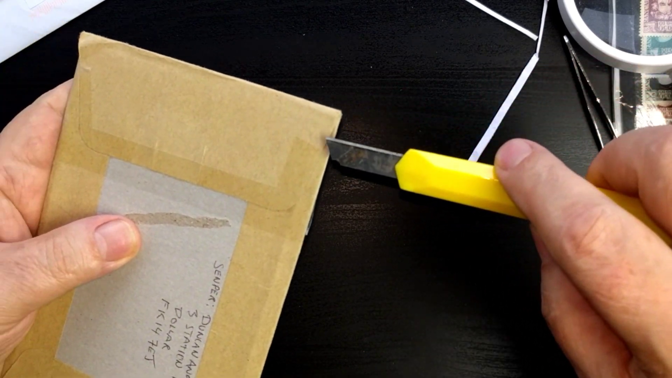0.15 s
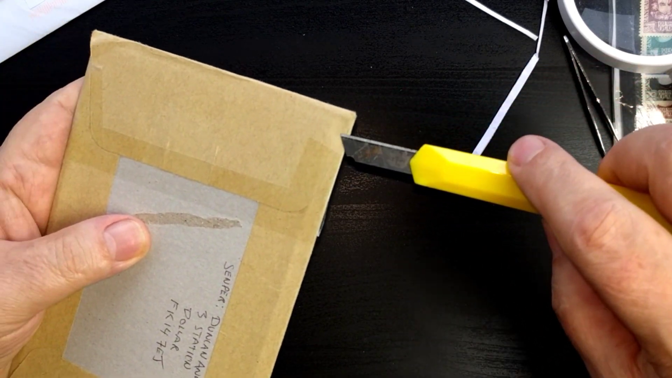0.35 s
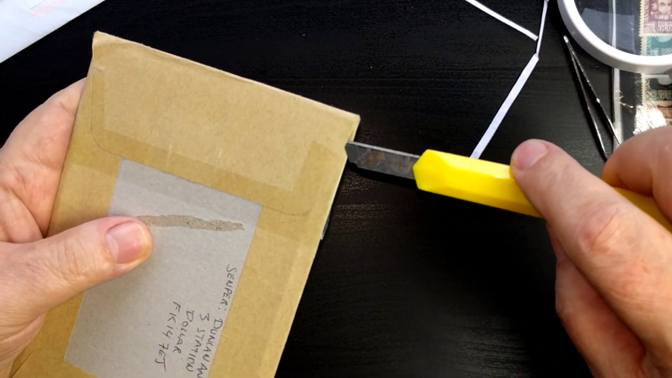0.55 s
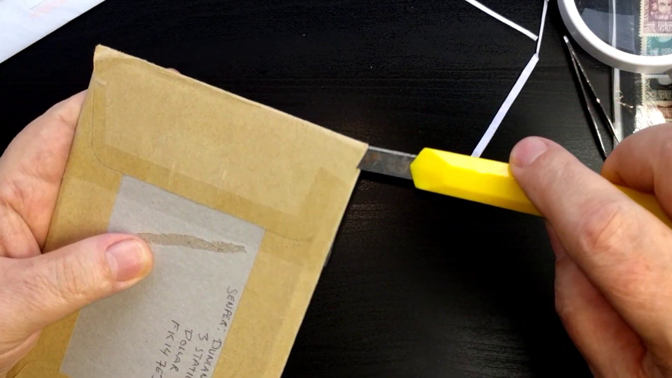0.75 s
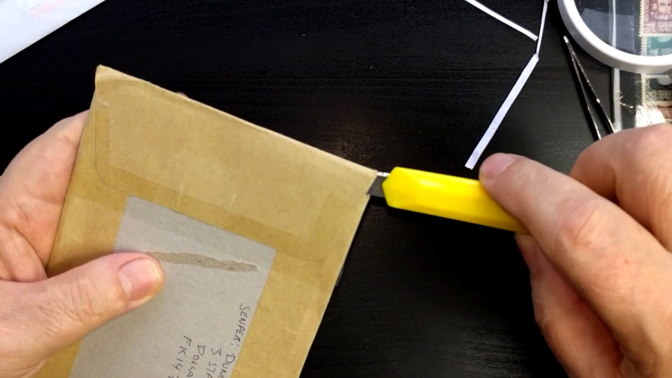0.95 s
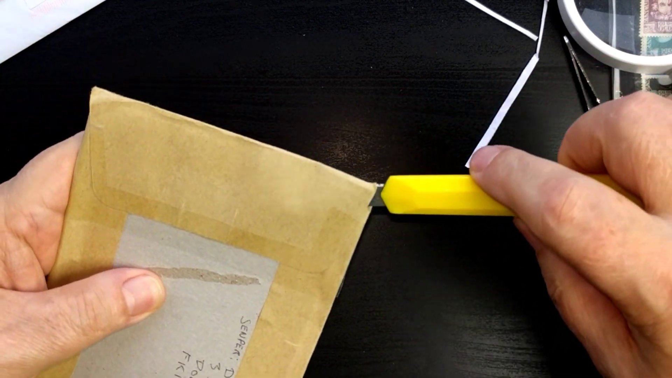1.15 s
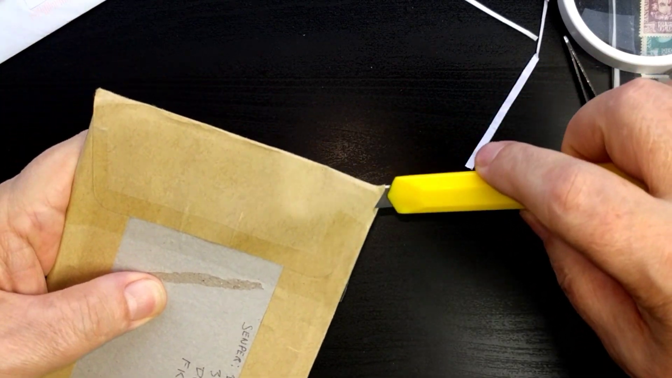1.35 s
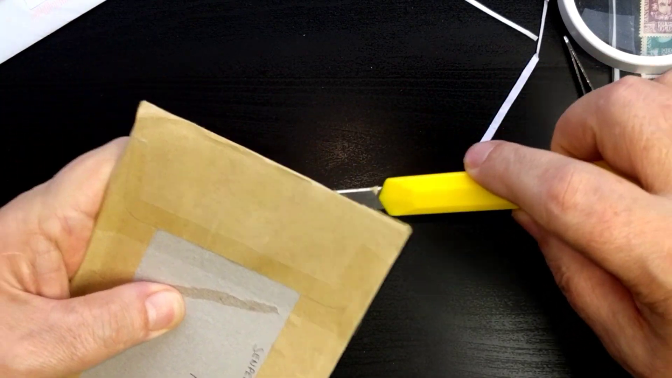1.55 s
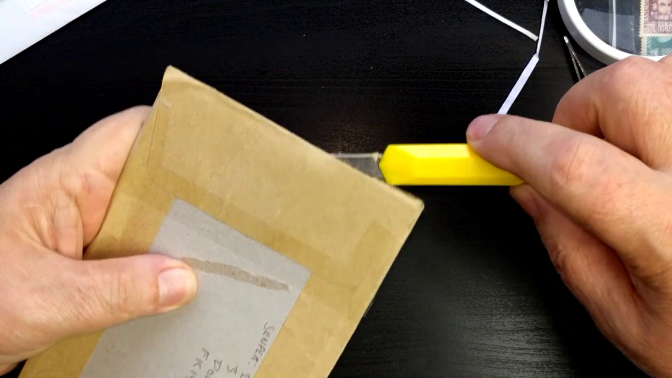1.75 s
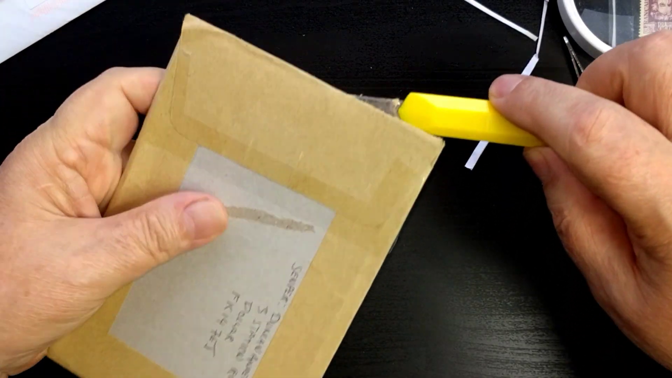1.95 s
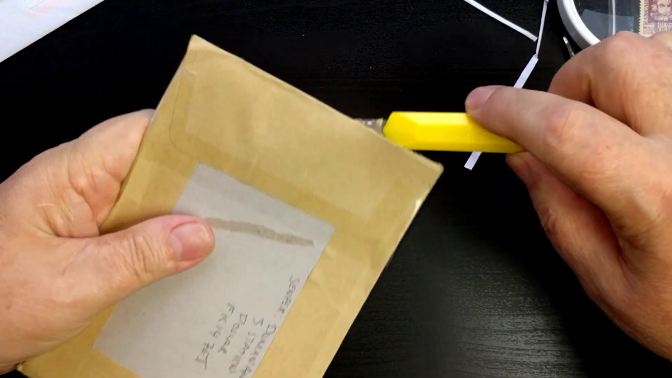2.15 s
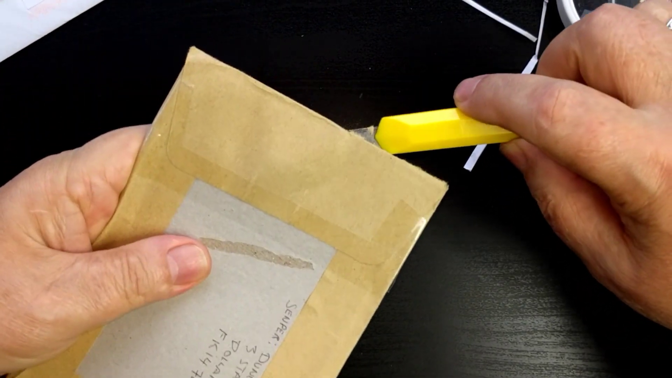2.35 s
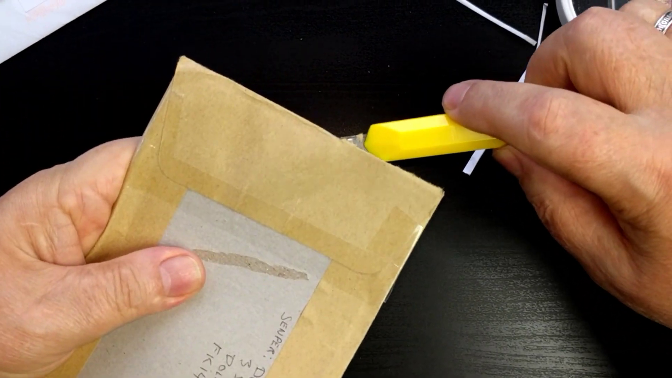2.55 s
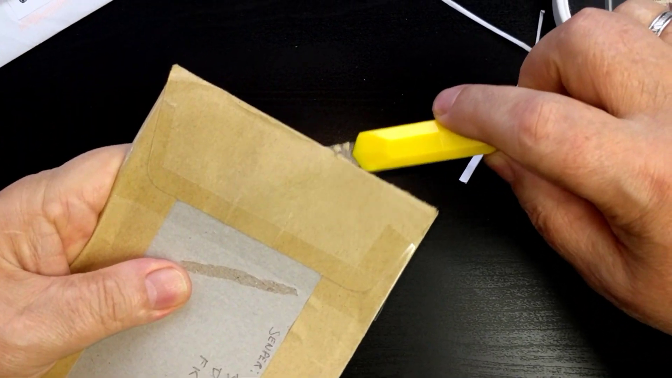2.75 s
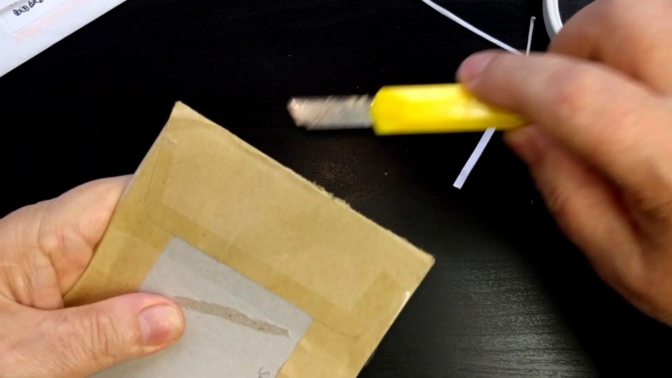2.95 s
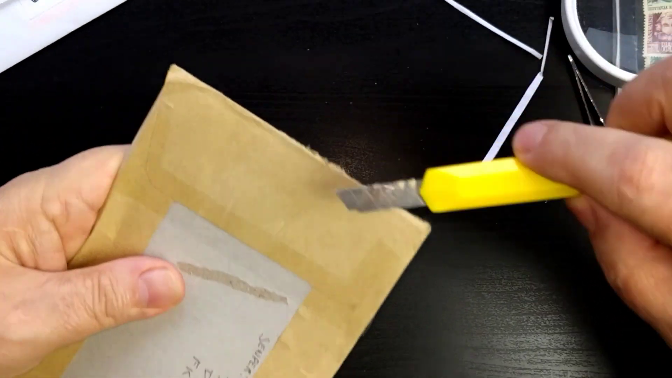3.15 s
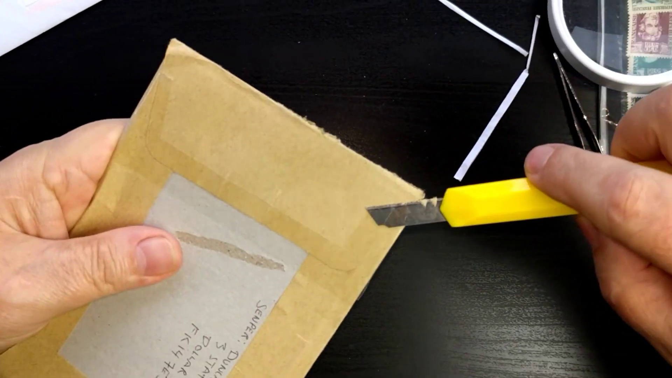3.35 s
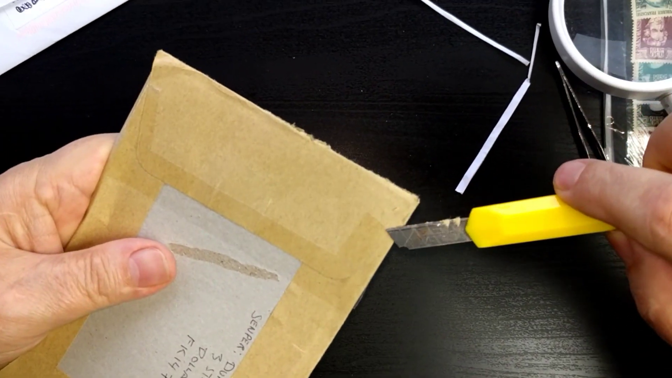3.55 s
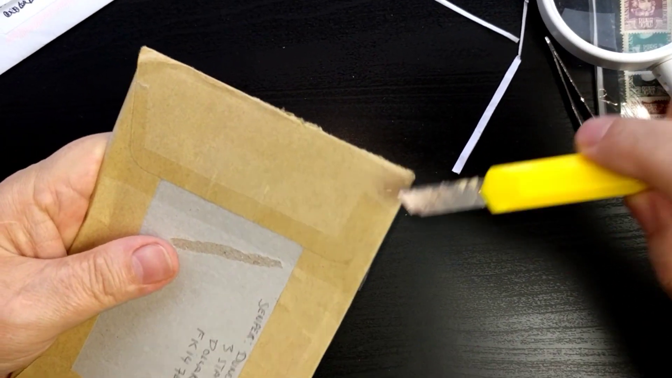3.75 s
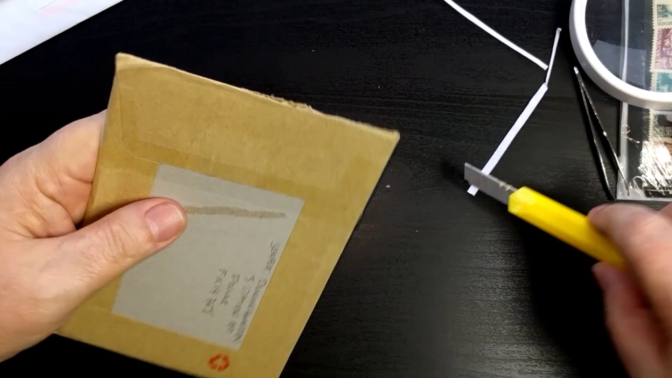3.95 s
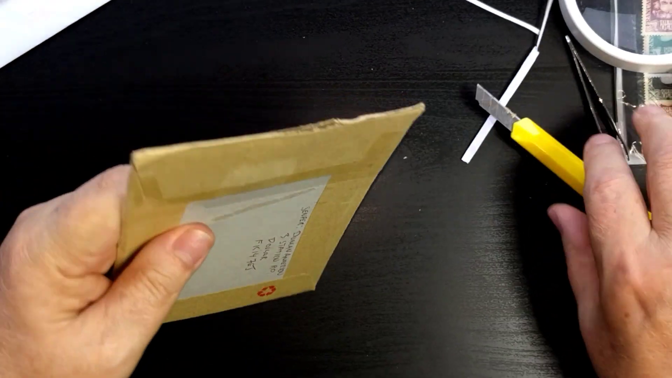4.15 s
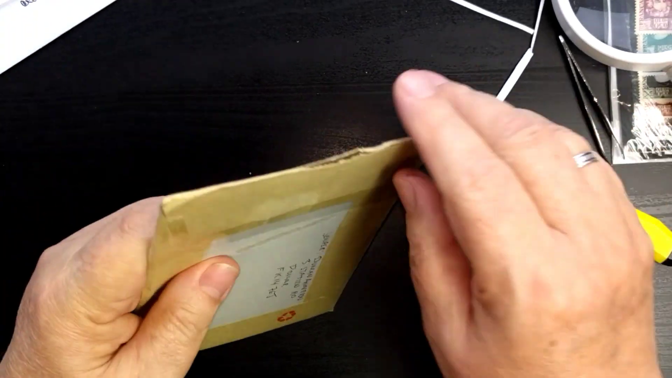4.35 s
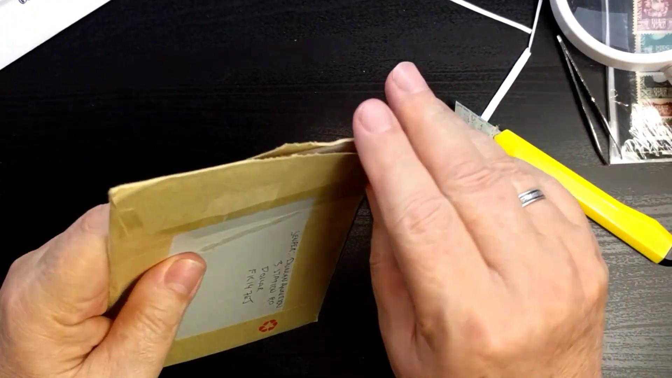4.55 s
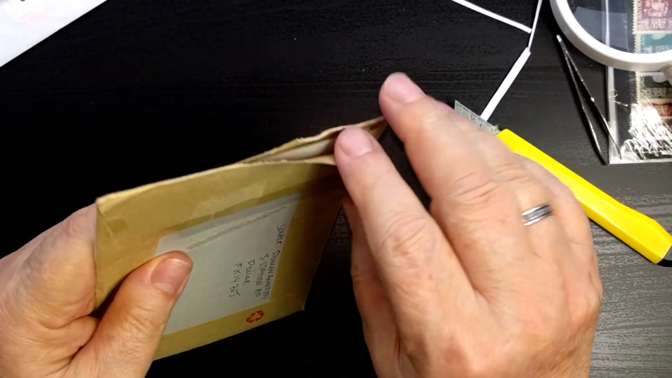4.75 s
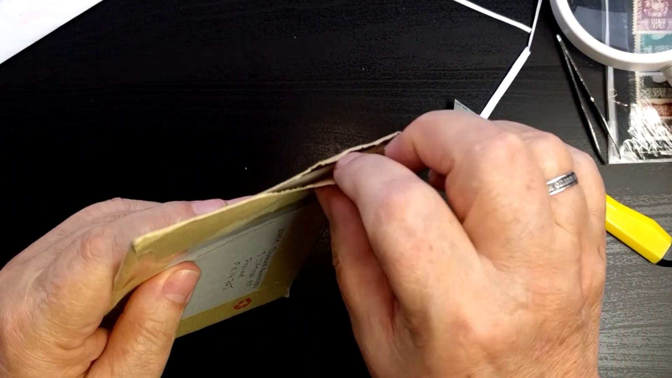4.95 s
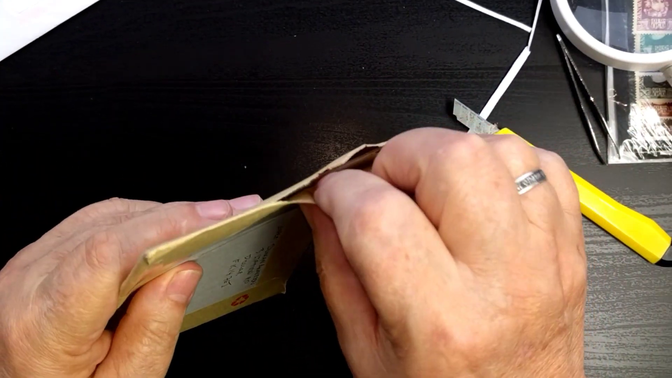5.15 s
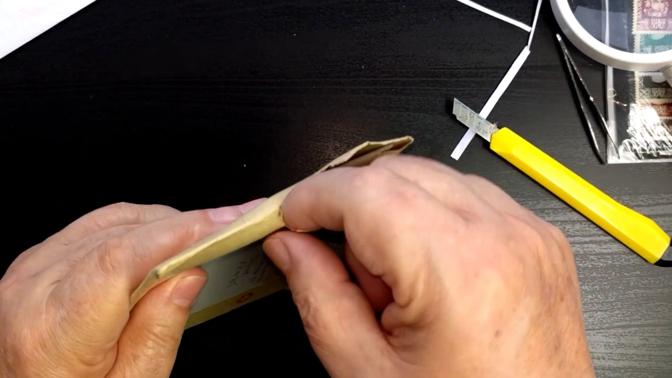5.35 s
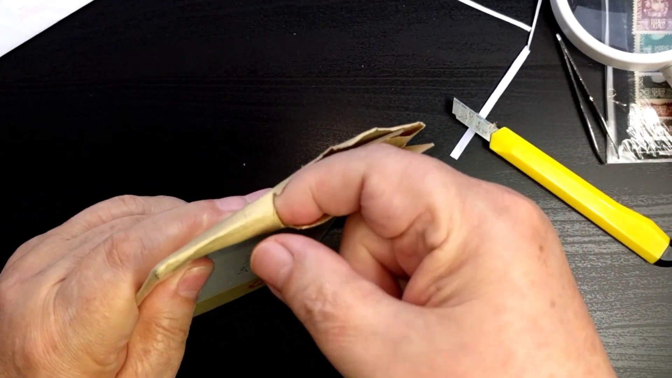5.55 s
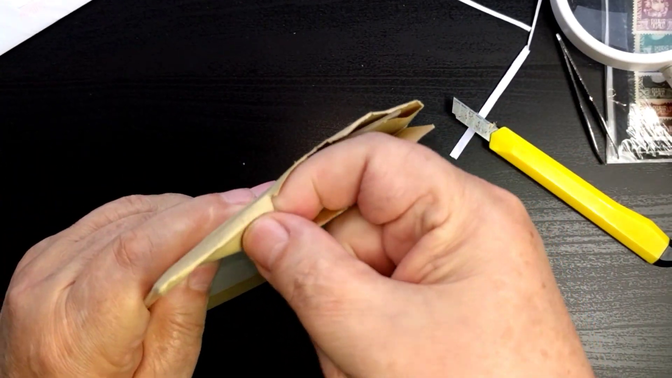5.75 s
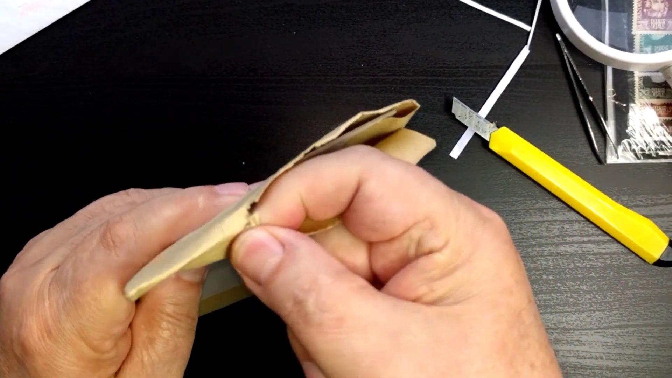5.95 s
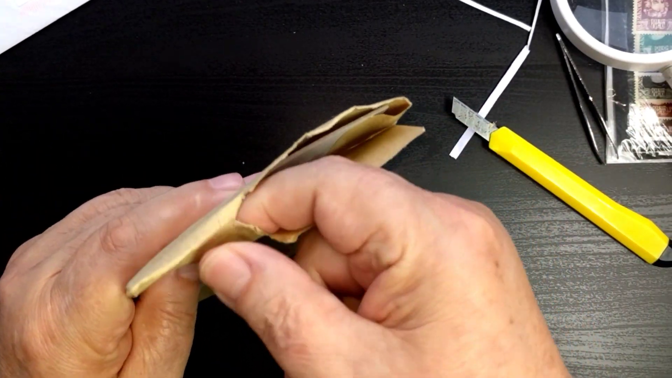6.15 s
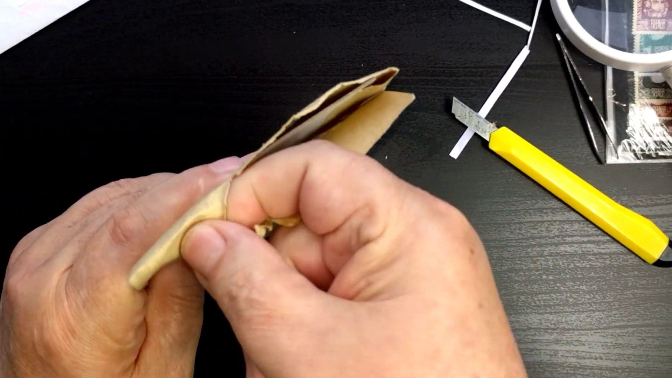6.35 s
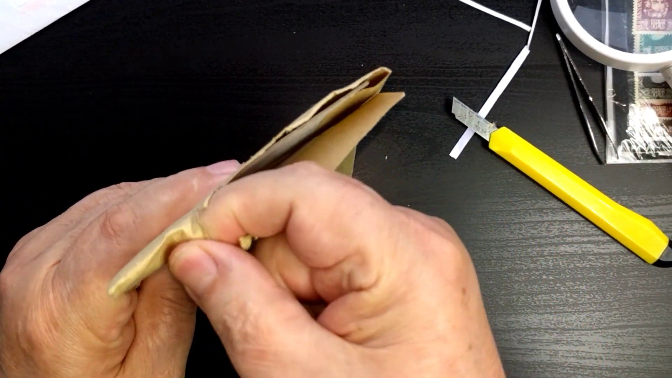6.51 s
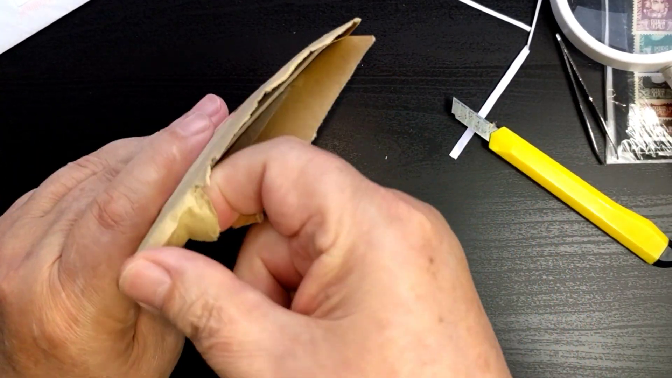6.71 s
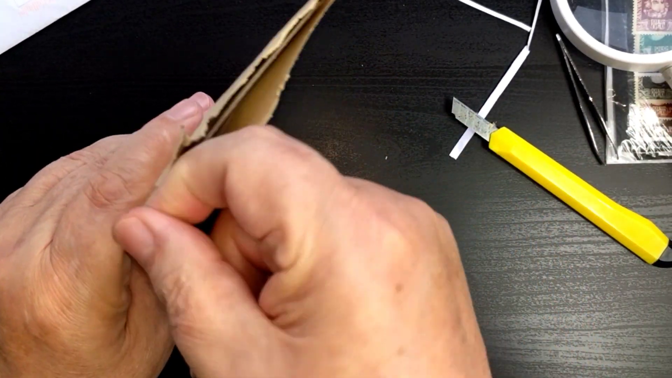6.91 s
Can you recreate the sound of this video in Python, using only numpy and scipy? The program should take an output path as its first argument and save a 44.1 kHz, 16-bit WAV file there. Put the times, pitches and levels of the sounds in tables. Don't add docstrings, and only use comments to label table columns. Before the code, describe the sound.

A blade saws through a stiff padded paper envelope in short crackling strokes, is set down with a clatter, then fingers tear the paper open.

```python
import sys
import numpy as np
from scipy import signal
from scipy.fft import rfft, irfft, next_fast_len
from scipy.io import wavfile
from scipy.ndimage import map_coordinates

SR = 44100
rng = np.random.default_rng(int(sys.argv[2]) if len(sys.argv) > 2 else 0)


def master_out(mix):
    frames = np.transpose(np.atleast_2d(mix))
    ceiling = np.clip(frames, -1, 1)
    pcm = np.round(ceiling * 32767).astype(np.int16)
    wavfile.write(sys.argv[1], SR, pcm)


def decibels_to_gain(level_db):
    exponent = np.asarray(level_db, float) / 20
    return 10 ** exponent


N = 307818


def unit(x):
    return x / np.sqrt(np.mean(x ** 2, axis=-1, keepdims=True) + 1e-20)


def along(points, hz):
    f, v = np.transpose(points)
    return np.interp(np.log(hz + 1), np.log(f + 1), v)


def curves(rows):
    s, *cols = np.transpose(rows)
    return [np.interp(np.arange(N) / SR, s, c) for c in cols]


def wobble(rate, n=None):
    n = n or N
    return map_coordinates(rng.standard_normal(int(n * rate / SR) + 4), [np.arange(n) * rate / SR])


def filtered(x, response):
    n = x.shape[-1]
    m = next_fast_len(n + 4096)
    return irfft(rfft(x, m) * response(np.fft.rfftfreq(m, 1 / SR)), m)[..., :n]


def peak(f, centre_hz, width_hz):
    return 1j * f * width_hz / (centre_hz ** 2 - f * f + 1j * f * width_hz)


def modes(f, table):
    return 1 + sum(decibels_to_gain(db) * peak(f, hz, width) for hz, width, db in table)


def place(pieces, starts):
    out = np.zeros(N + SR)
    for piece, s in zip(pieces, starts):
        out[round(s * SR):][:len(piece)] += piece
    return out[:N]


def fibres(n, spiky_db, clump_db, ticks=45):
    size = decibels_to_gain(spiky_db * np.minimum(rng.exponential(size=n), 4) + clump_db * wobble(170, n))
    tick = (rng.random(n) < ticks / SR) * rng.uniform(5, 13, n)
    return size * rng.standard_normal(n) + np.convolve(tick, rng.standard_normal(12))[:n] / 3


# freq_hz, gain_db
SHEET = [(250, 5), (600, -1), (1200, -2), (2000, -2), (3500, -1.5), (6000, -7), (9000, -12.5), (16000, -10)]
# freq_hz, gain_db
HISS = [(2500, -101), (5000, -4), (8000, 0.5), (12000, 1), (15800, -7.5)]
BLADE_DOWN_S = 3.05
SLIT_HZ, PULL_HZ = 2300, 700


def stroke(start, end, db, crest, ring_hz, hiss_db):
    sawing = start < BLADE_DOWN_S
    n = round((end - start) * SR)
    u = np.arange(n) / n
    force = np.clip((db + 42.5) / 28, 0, 1)
    edge = .005 / (end - start)
    soft = .22 * (1 - force)
    rise = np.clip(u / (edge + soft * crest), 0, 1)
    fall = np.clip((1 - u) / (edge + soft * (1 - crest)), 0, 1)
    swell = decibels_to_gain(-17 * np.abs(u - crest) ** 1.38) * rise * fall
    long = SR // 3
    tear = fibres(long, spiky_db=1.6 + force, clump_db=1.3 + 1.2 * force, ticks=50 * (1 - force) ** 3)[:n]
    bend_db = 2.2 * rng.standard_normal(44)
    thin_hz = SLIT_HZ if sawing else PULL_HZ

    def bend(f):
        return decibels_to_gain(np.interp(f, np.linspace(0, SR / 2, len(bend_db)), bend_db))

    def body(hz):
        def response(f):
            flap = (1 + 1.5 * np.abs(peak(f, hz, .22 * hz))) * f / np.hypot(f, thin_hz)
            return bend(f) * decibels_to_gain(along(SHEET, f)) * flap
        return filtered(tear, response)

    glide = .22 if sawing else 0
    sheet = (1 - u) * body(ring_hz * (1 - glide)) + u * body(ring_hz * (1 + glide))
    hiss = filtered(tear, lambda f: bend(f) * decibels_to_gain(along(HISS, f))) * decibels_to_gain(1.0 * wobble(66, long)[:n])
    sheet = unit(sheet) * decibels_to_gain(1.74 * wobble(36, long)[:n])
    return decibels_to_gain(db) * swell * (sheet + decibels_to_gain(hiss_db - 4.5) * unit(hiss))


# start_s, end_s, level_db, sheet_hz, hiss_db
EVEN = [(.159, .187, -36.5, 5500, -8), (.459, .505, -56.5, 3620, -8), (1.067, 1.178, -42.5, 2200, -15),
        (1.19, 1.345, -46, 3600, -12), (1.397, 1.431, -43.5, 3700, -17), (1.483, 1.548, -31, 4060, 2.5),
        (1.95, 2.13, -48.5, 3740, -2), (2.194, 2.291, -36.5, 5000, -5), (2.391, 2.48, -45, 5140, -10),
        (2.653, 2.732, -38, 3530, -5), (2.863, 2.93, -26, 5600, -1), (3.114, 3.205, -54, 3070, -17),
        (3.786, 4.04, -49.5, 5270, -4), (4.578, 4.673, -56, 6500, 3), (4.849, 4.976, -49, 6330, 1),
        (4.98, 5.084, -51.5, 3250, 6), (5.355, 5.52, -41, 3460, 6), (5.651, 5.814, -47.5, 3040, -7),
        (6.301, 6.414, -37.5, 7200, -5), (6.675, 6.79, -33.5, 2900, -1.5), (5.514, 5.64, -38, 2900, -1),
        (6.447, 6.475, -24, 2244, -20)]
# start_s, end_s, level_db, sheet_hz, hiss_db
TUGS = [(.536, .593, -52.5, 4420, -12), (.632, .737, -56.5, 5000, -13), (.718, .9, -54, 3800, -5),
        (1.595, 1.708, -31.5, 5600, 0), (2.097, 2.19, -41.5, 6760, -10), (3.696, 3.769, -49.5, 3900, 0),
        (4.102, 4.127, -32.5, 7560, 10), (4.714, 4.83, -53, 5250, 4.5), (5.118, 5.266, -50, 6150, 6),
        (5.252, 5.376, -43.5, 7260, 4.5), (5.823, 5.93, -44.5, 2080, -21), (5.951, 6.041, -37.5, 1640, -4),
        (6.035, 6.11, -51, 2900, 16), (6.179, 6.25, -38.5, 2200, 5), (6.434, 6.504, -30, 2900, 0.5),
        (6.596, 6.636, -36, 6810, -12), (6.882, 6.905, -18, 3350, -11), (6.905, 6.977, -46.5, 3140, 12)]
# start_s, end_s, level_db, sheet_hz, hiss_db
PUSHES = [
    (.869, 1.012, -43.5, 5070, -1.5),
    (1.756, 1.781, -32.5, 5400, -7),
    (1.807, 1.97, -46.5, 2800, -4.5),
    (6.817, 6.883, -30, 2700, -3),
]
# start_s, end_s, level_db, sheet_hz, hiss_db
JOLTS = [(1.555, 1.595, -53, 4100, -7), (2.76, 2.807, -40.5, 6540, -2.5), (2.927, 3.03, -50, 5500, 8),
         (3.402, 3.44, -51, 6700, 2), (4.135, 4.25, -36.5, 2980, 3.5), (4.246, 4.295, -22, 5160, -5),
         (4.313, 4.4, -25.5, 5200, -2.5), (4.428, 4.52, -33, 1920, -27), (6.51, 6.57, -39.5, 2900, -10)]
CREST_EVEN, CREST_TUG, CREST_PUSH, CREST_JOLT = 0.53, .28, 0.89, 0.019


def strokes():
    kinds = [(EVEN, CREST_EVEN), (TUGS, CREST_TUG), (PUSHES, CREST_PUSH), (JOLTS, CREST_JOLT)]
    rows = []
    for table, crest in kinds:
        rows += [(start, end, db, crest, hz, hiss) for start, end, db, hz, hiss in table]
    rows.sort()
    return place([stroke(*row) for row in rows], [row[0] for row in rows])


def whistle(start, end, db, first_hz, last_hz):
    n = round((end - start) * SR)
    u = np.arange(n) / n
    width_hz = 520
    slow = filtered(rng.standard_normal((2, SR // 5)), lambda f: 1 / (1 + (f / width_hz) ** 2))[:, :n]
    turn = 2 * np.pi * np.cumsum(first_hz + (last_hz - first_hz) * u) / SR
    return decibels_to_gain(db) * np.sin(np.pi * u ** 1.2) * unit(slow[0] * np.cos(turn) + slow[1] * np.sin(turn))


# start_s, end_s, level_db, sheet_hz, hiss_db
CLUMPS = [(1.491, 1.502, -25, 3600, -3), (1.5, 1.513, -21, 6200, -2), (1.513, 1.523, -22, 3600, 2),
          (1.523, 1.536, -23, 3800, 0), (1.535, 1.545, -22, 3800, 0), (2.864, 2.874, -20, 3200, -1),
          (2.874, 2.886, -20, 5300, -2), (2.891, 2.906, -21, 5200, 5), (2.91, 2.927, -22, 5500, 0),
          (2.776, 2.79, -38, 5600, 0), (6.894, 6.903, -18, 3100, -2), (4.203, 4.235, -38, 5500, 0),
          (1.597, 1.615, -29, 5600, -4), (4.238, 4.25, -22, 2500, 2), (3.53, 3.55, -50, 4000, 2),
          (4.135, 4.147, -30, 4600, -3)]
# start_s, end_s, level_db, first_hz, last_hz
WHISTLES = [(2.654, 2.732, -35.5, 2300, 5000), (1.598, 1.705, -33, 3300, 3500),
            (2.2, 2.27, -41, 3000, 5600), (.535, .595, -56, 3800, 4600), (1.22, 1.335, -52, 2600, 3200)]


def slips():
    clumps = [stroke(start, end, db, CREST_EVEN, hz, hiss) for start, end, db, hz, hiss in CLUMPS]
    return place(clumps + [whistle(*row) for row in WHISTLES], [row[0] for row in CLUMPS + WHISTLES])


# time_s, peak_db, ring_hz, hiss_db
SNAGS = [(.1279, -33.5, 4050, -23), (.1734, -16.5, 5500, -1.5), (.3092, -20, 3550, -3.5),
         (.8642, -14.5, 5050, -16.5), (1.057, -16.5, 4800, -34), (1.4083, -25, 5360, -26),
         (1.4147, -26, 3730, -25), (1.4688, -31, 6180, -11), (1.5408, -14, 4030, -17),
         (1.7616, -20, 5440, -6), (1.7745, -13, 8200, -10), (2.2652, -21.5, 5100, -5),
         (2.4053, -28, 5200, -27), (2.4577, -19, 4500, 1.5), (2.594, -40, 5600, 8), (2.8666, -16, 3070, -1),
         (3.0093, -26, 4000, -21), (3.1124, -15.5, 4700, -27), (3.2126, -38, 3350, -13)]
# time_s, peak_db, ring_hz, hiss_db
RATTLES = [(3.4001, -9.5, 6040, -17.5), (3.557, -29, 3200, -16), (3.6236, -19, 6400, -13),
           (3.8327, -23.5, 5960, -12), (3.8988, -17, 6600, -25), (3.9423, -25.5, 5100, -18),
           (4.0223, -27.5, 2640, 0), (4.0615, -22.5, 4330, -10), (4.1035, -16, 6650, 12),
           (4.1144, -25, 8000, -20), (4.138, -22, 4580, -21), (4.2368, -7, 5950, 3.5),
           (4.3166, -6.5, 5300, -14), (4.3579, -11.5, 1990, -13), (4.4279, -8.5, 2420, -26)]
# time_s, peak_db, ring_hz, hiss_db
CREASES = [(4.8623, -24, 6404, -17), (5.4087, -5.5, 3316, -13), (5.4154, -17, 3380, -3),
           (5.4364, -14.5, 2280, -7), (5.5538, -28, 2180, -5), (5.5646, -28, 3045, -12),
           (5.725, -31, 3150, 5), (5.8377, -26, 2200, 3.5), (5.8614, -24.5, 2770, -18),
           (6.1173, -17, 2600, -40), (6.2174, -32, 2200, 15.5), (6.2421, -26, 2760, 4),
           (6.3104, -27, 7430, 2), (6.3167, -16.5, 7300, -4), (6.383, -28.5, 2930, 13.5),
           (6.418, -21, 2210, -1), (6.4353, -21, 3060, -1), (6.6066, -17.5, 2840, -4),
           (6.841, -16, 2720, -13), (6.8689, -28, 2940, -6), (6.8846, -8, 3083, -3), (6.8952, -9, 3200, -3)]
# time_s, peak_db, ring_hz, hiss_db
BUCKLES = [(.169, -14.5, 5210, -12), (.5911, -23, 4440, -6.5), (1.1034, -29, 4970, -22),
           (1.1124, -23.5, 2200, -26), (1.1165, -22, 2110, -36),            (2.2273, -25, 5100, -16),
           (2.3922, -33, 5530, -9), (2.4226, -17, 3000, 1), (2.7609, -19, 5490, -15),
           (3.1394, -34, 3820, -28), (3.9909, -22, 4550, -19), (4.2484, -12, 5550, 6),
           (4.3393, -12.5, 3147, -0.5), (5.4258, -13, 3340, -3), (5.5303, -18, 3270, -6),
           (5.653, -24, 3130, -9), (5.9668, -32, 2900, -16), (5.9761, -17.5, 1682, -16),
           (6.0397, -4, 2900, -7), (6.2776, -24, 2782, -12), (6.3619, -8.5, 6970, -15),
           (6.403, -17.5, 1350, -19), (6.5123, -10, 1890, -26), (6.7331, -12, 2726, -22)]
THUD_SNAG_DB, THUD_RATTLE_DB, THUD_CREASE_DB, THUD_BUCKLE_DB = -25.5, -30.5, -29, -13
THUD_SHRINKS = 0.33
SHIVER_S, SHIVER_DB = 0.0076, -22
# start_s, end_s
KNIFE = (3.39, 4.45)


def snaps():
    kinds = [(SNAGS, THUD_SNAG_DB), (RATTLES, THUD_RATTLE_DB),
             (CREASES, THUD_CREASE_DB), (BUCKLES, THUD_BUCKLE_DB)]
    rows = [(*row, thud) for table, thud in kinds for row in table]
    s, db, ring_hz, hiss_db, thud_db = np.transpose(rows)[:, :, None]
    thud_db = thud_db - THUD_SHRINKS * (db + 20.5)
    t = np.arange(2048) / SR
    knife = (s > KNIFE[0]) & (s < KNIFE[1])
    life_s = np.where(knife, .0016, .00078) * decibels_to_gain(0.022 * (db + 12.5))
    shiver = decibels_to_gain(SHIVER_DB) * np.exp(-t / SHIVER_S) * (1 - np.exp(-t / life_s))
    release = (t / life_s) ** 2 * np.exp(.6 - 1.6 * t / life_s)
    burst = (release + shiver) * rng.standard_normal((len(s), len(t)))
    burst[:, 44] += .7

    def top(x):
        return x / np.abs(x).max(axis=1, keepdims=True)

    ring = filtered(burst, lambda f: peak(f, ring_hz, .34 * ring_hz))
    crack = filtered(burst, lambda f: peak(f, 5630, 13500) ** 2)
    thud = filtered(burst, lambda f: peak(f, 900, 2200) ** 2)
    hiss = filtered(burst, lambda f: peak(f, 13160, 14400) ** 2)
    sharp = decibels_to_gain(hiss_db - 3) * top(hiss) + decibels_to_gain(0.79 * hiss_db) * top(crack)
    return place(decibels_to_gain(db) * (0.48 * top(ring) + decibels_to_gain(thud_db) * top(thud) + sharp), s[:, 0] - .0005)


# time_s, peak_db, ring_hz, t60_s
POPS = [(6.1173, -1.5, 2200, .011), (6.1173, -15, 6100, .007), (6.1173, -10, 2950, .005),
        (6.0405, -17, 1400, .008), (6.0402, -14, 12500, .004), (6.041, -21, 700, .012),
        (6.5124, -14, 1900, .008), (1.113, -31, 950, .02), (1.114, -31, 2250, .03), (3.621, -42, 880, .03),
        (.169, -35, 800, .015), (4.237, -19, 1550, .015), (.59, -37, 1600, .01), (.59, -40, 600, .015),
        (2.458, -28, 800, .012), (2.458, -26, 1600, .008), (3.399, -35, 380, .03), (5.409, -17, 3200, .025)]


def pops():
    s, db, hz, t60 = np.transpose(POPS)[:, :, None]
    t = np.arange(2048) / SR
    rise_s = .0003
    return place(decibels_to_gain(db - 60 * t / t60) * (1 - np.exp(-t / rise_s)) * np.sin(2 * np.pi * hz * t), s[:, 0])


# time_s, peak_db, centre_hz
TICKS = [(0.7863, -34, 5900), (1.2395, -34, 7000), (1.4009, -34, 4900), (1.4148, -27, 4600),
         (1.4534, -39, 6000), (1.4875, -19, 5400), (1.7253, -20, 7900), (2.0016, -29, 7600),
         (2.3383, -41, 9000), (2.3981, -32, 6000), (2.4038, -34, 6000), (2.4096, -29, 7400),
         (2.4355, -27, 7500), (2.4683, -29, 7000), (2.5203, -39, 7100), (2.5935, -20, 9800),
         (2.6391, -42, 9000), (2.7692, -32, 8000), (2.7775, -28, 6700), (2.7999, -34, 8000),
         (2.8148, -40, 9000), (3.3971, -29, 4100), (3.6178, -30, 5200), (3.8819, -30, 5800),
         (4.0733, -26, 13600), (4.1155, -15, 8700), (5.3982, -23, 7000), (5.4483, -24, 11000),
         (5.4687, -19, 12100), (5.4768, -29, 12000), (5.5144, -29, 8300), (5.525, -25, 9100),
         (5.5536, -19, 11300), (5.5646, -14, 10100), (5.5724, -21, 11500), (5.627, -25, 11300),
         (5.6299, -26, 12000), (5.6833, -34, 10400), (5.9682, -24, 6500), (6.0115, -32, 11400),
         (6.0198, -31, 7000), (6.0472, -13, 10700), (6.0545, -18, 11000), (6.0651, -18, 11400),
         (6.087, -26, 10300), (6.1049, -34, 10000), (6.1816, -20, 13200), (6.2746, -33, 9900),
         (6.3272, -25, 8600), (6.3372, -18, 10300), (6.3489, -25, 8200), (6.3531, -21, 11100),
         (6.3579, -21, 12000), (6.3658, -15, 11000), (6.3964, -24, 11200), (6.4227, -24, 10000),
         (6.4871, -24, 5900), (6.5982, -32, 10100), (6.8261, -28, 5700), (6.8982, -7, 4800)]
TICK_S, TICK_DB, TICK_WIDE = .00022, 0.1, 1.6


def ticks():
    s, db, hz = np.transpose(TICKS)[:, :, None]
    u = np.arange(256) / SR / TICK_S
    noise = rng.standard_normal((len(s), len(u)))
    burst = filtered(u * np.exp(-u) * noise, lambda f: peak(f, hz, TICK_WIDE * hz))
    burst /= np.abs(burst).max(axis=1, keepdims=True)
    return place(decibels_to_gain(db + TICK_DB) * burst, s[:, 0] - TICK_S)


# start_s, end_s, level_db
SCRAPE = (3.45, 4.09, -59)
# freq_hz, width_hz, gain_db
SLIDING = [(458, 40, 3), (980, 40, -2), (1416, 22, 5), (1775, 26, 7), (2100, 50, 0), (2560, 60, 2),
           (2770, 380, -12)]


def scrape():
    start, end, db = SCRAPE
    n = round((end - start) * SR)
    u = np.arange(n) / n
    grains = fibres(SR, spiky_db=2.5, clump_db=3.5, ticks=30)[:n]
    sheet = filtered(grains, lambda f: sum(decibels_to_gain(g) * peak(f, hz, 1.8 * width) for hz, width, g in SLIDING))
    level = decibels_to_gain(db + 7.8 * u + 2.5 * wobble(17.2, SR)[:n])
    gate = np.clip(np.minimum(u / 0.052, (1 - u) / 0.062), 0, 1)
    return place([level * gate * unit(sheet)], [start])


# freq_hz, width_hz, gain_db
CAVITY = [(2200, 130, 2), (3010, 300, 1.5), (14500, 2100, 3)]


def gaping_pouch(paper):
    opened = np.clip((np.arange(N) / SR - 5.2) / 0.25, 0, 1)
    return paper + opened * (filtered(paper, lambda f: 0.58 * modes(f, CAVITY)) - paper)


# time_s, peak_db, ring_hz
BUMPS = [(1.263, -37, 820), (1.494, -27, 800), (2.419, -53, 238), (2.758, -32, 337), (2.912, -20, 820),
         (3.398, -38, 860), (4.235, -22, 850), (4.319, -43, 700), (4.426, -30, 300.6), (5.409, -28.5, 485),
         (5.53, -28.5, 443.5), (5.614, -20, 550), (6.039, -22, 427)]
# time_s, peak_db, ring_hz, t60_s
DESK = [
    (4.238, -36, 305, 0.2),
    (4.24, -30.5, 127, 0.068),
    (1.5, -34, 212, 0.063),
]
BUMP_T60_S = 0.017


def bumps():
    s, db, hz, t60 = np.transpose([(*row, BUMP_T60_S) for row in BUMPS] + DESK)[:, :, None]
    t = np.arange(4096) / SR
    ring = np.sin(2 * np.pi * hz * t) + 0.28 * np.sin(2 * np.pi * 1.4 * hz * t)
    return place(decibels_to_gain(db - 60 * t / t60) * (1 - np.exp(-t / 0.00083)) * ring, s[:, 0])


# time_s, level_db
FLEX = [(0.0, -67.5), (1.54, -59.5), (3.4, -67), (3.81, -59), (6.98, -56)]
# freq_hz, gain_db
POUCH = [(240, -47), (330, -1), (450, -5), (800, -12), (1400, -9.5), (2200, -10), (4000, -19)]


def flex():
    level_db, = curves(FLEX)
    creak = filtered(fibres(N, spiky_db=2.2, clump_db=2.0), lambda f: decibels_to_gain(along(POUCH, f)))
    return decibels_to_gain(level_db + 2.5) * unit(creak)


# freq_hz, t60_s
ROOM = [(300, 0.88), (2500, 0.31), (7000, 0.29), (15000, 0.15)]
TAIL_STEP_S = .14


def room(x):
    step = round(TAIL_STEP_S * SR)
    parts = np.pad(x, (150, step))[:(N // step + 1) * step].reshape(-1, step)
    hz, t, z = signal.stft(rng.standard_normal((len(parts), SR // 2)), SR, nperseg=256)
    tails = signal.istft(z * decibels_to_gain(-60 * t / along(ROOM, hz)[:, None]), SR, nperseg=256)[1]
    tails /= np.linalg.norm(tails, axis=1, keepdims=True)
    return place(signal.fftconvolve(parts, tails, axes=1), np.arange(len(parts)) * step / SR)


# time_s, firing_hz, firing_db, upper_db
VEHICLE = [(2.9, 76.4, -63, -77), (3.1, 75.8, -48.5, -69), (3.3, 76.3, -86, -82), (3.8, 76.3, -47, -64),
           (4.19, 76.8, -48.5, -80), (4.5, 62.5, -52, -56.5), (4.97, 70.2, -51, -54),
           (5.56, 72.85, -50.5, -53), (5.9, 74, -40.5, -53), (6.2, 73.7, -46.5, -56),
           (6.48, 69.25, -53, -53), (6.6, 67.1, -44, -56), (6.75, 65.1, -48, -58), (6.98, 62.4, -50, -60)]
# multiple_of_firing, level_db
UPPER = [(1.359, -14), (2.03, 6.5), (2.25, -4), (2.681, -3), (2.972, 6.5)]
# freq_hz, width_hz, gain_db
WINDOW = [(163, 14, 3), (192, 12, 12)]
# start_s, level_db
SECOND = (6.72, -41)
SECOND_HZ = 82


def vehicle():
    s = np.arange(N) / SR
    hz, firing_db, upper_db = curves(VEHICLE)
    turn = 2 * np.pi * np.cumsum(hz) / SR
    upper = sum(decibels_to_gain(db + 2.5 * wobble(2.5)) * np.sin(k * turn + .5 * wobble(6)) for k, db in UPPER)
    upper = unit(filtered(upper, lambda f: modes(f, WINDOW)))
    firing = np.sin(turn + 0.29 * wobble(3.9))
    start, second_db = SECOND
    fade_in = np.clip((s - start) / 0.1, 0, 1)
    second = decibels_to_gain(second_db) * fade_in * np.sin(2 * np.pi * SECOND_HZ * s + 0.64 * wobble(4.2))
    return decibels_to_gain(firing_db + 5.0) * firing + decibels_to_gain(upper_db - 0.5) * upper + second


def swell(middle, length, first_hz, last_hz, db):
    u = np.arange(round(length * SR)) / (length * SR)
    turn = 2 * np.pi * np.cumsum(first_hz + (last_hz - first_hz) * u) / SR + .3 * wobble(7, SR * 2)[:len(u)]
    return decibels_to_gain(db + 1.5 * wobble(9, SR * 2)[:len(u)]) * np.sin(np.pi * u) * np.sin(turn)


# middle_s, length_s, first_hz, last_hz, level_db
SWELLS = [(4.82, .26, 190, 190, -47), (5.05, 1.0, 96, 102, -54), (5.0, .9, 143, 155, -53),
          (5.93, .34, 165, 165, -46), (6.23, .28, 216, 212, -44), (6.37, .26, 194, 190, -46),
          (6.57, .26, 192, 190, -42), (6.78, .3, 174, 170, -46)]


def swells():
    return place([swell(*row) for row in SWELLS], [middle - length / 2 for middle, length, *_ in SWELLS])


# time_s, rumble_db, drone_db
STREET = [(0.0, -51, -57), (2.27, -56.5, -59.5), (6.98, -54, -48)]
# freq_hz, density_db
HUSH = [(35, -45), (60, 3.5), (115, 2.5), (193, -5), (268, -26), (308, -18.5), (492, -42), (842, -18),
        (1040, -26), (16000, -30.5)]
HUSH_DB = -48.5


def street():
    rumble_db, drone_db = curves(STREET)
    noise = rng.standard_normal((3, N))
    rumble = unit(filtered(noise[0], lambda f: peak(f, 43.7, 12.4) ** 2))
    drone = unit(filtered(noise[1], lambda f: peak(f, 171, 57) ** 2 + 0.57 * peak(f, 208.0, 47) ** 2))
    hush = unit(filtered(noise[2], lambda f: decibels_to_gain(along(HUSH, f))))
    return decibels_to_gain(rumble_db) * rumble + decibels_to_gain(drone_db - 0.5) * drone + decibels_to_gain(HUSH_DB - 7.5) * hush


def scene():
    paper = strokes() + snaps() + scrape() + slips() + ticks()
    paper = gaping_pouch(paper) + pops()
    near = paper + decibels_to_gain(-11.5) * room(paper) + bumps() + flex()
    return (near + vehicle() + swells() + street())[None]


def band_limit(x):
    return signal.sosfilt(signal.butter(12, 16970, fs=SR, output="sos"), x)


def record(dry):
    top_hz = 15750
    band = filtered(dry, lambda f: (f / (f + 12)) ** 2 * np.clip((top_hz - f) / 180 + 1, .012, 1))
    return band_limit(band)


dry = scene()
out = record(dry)
master_out(out)
```